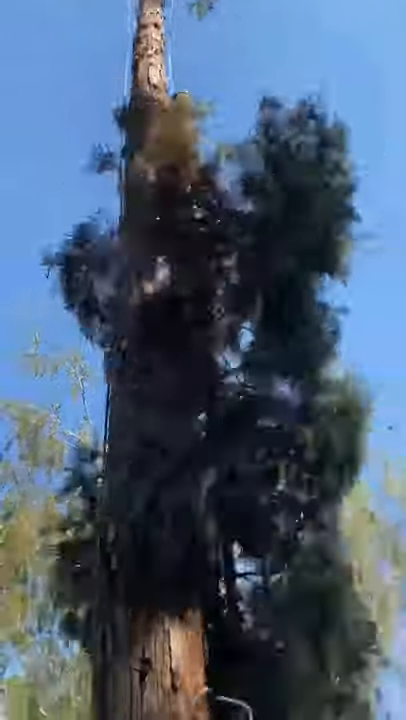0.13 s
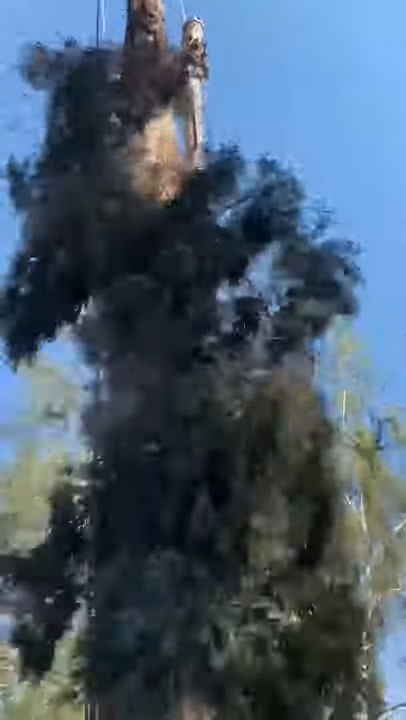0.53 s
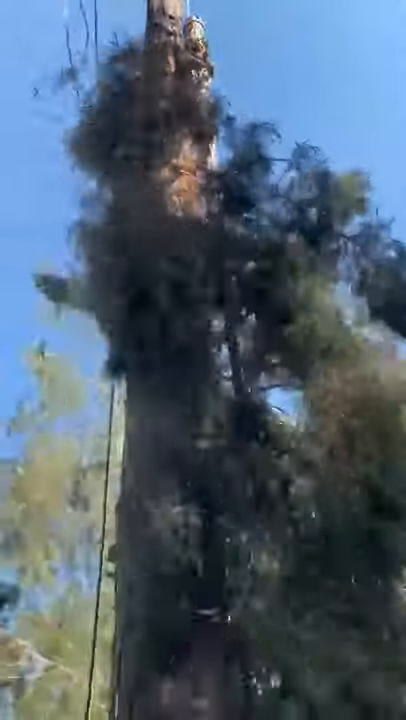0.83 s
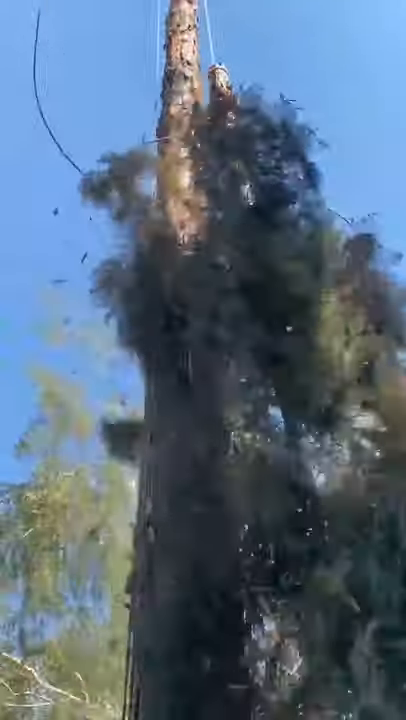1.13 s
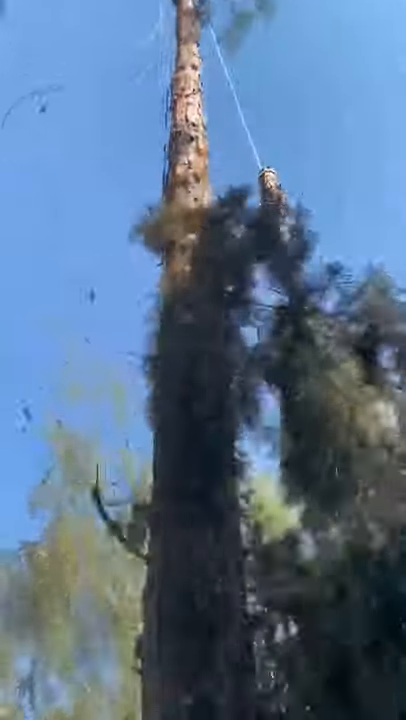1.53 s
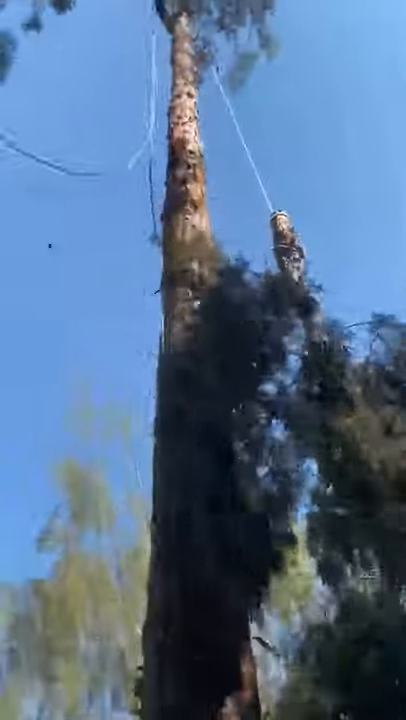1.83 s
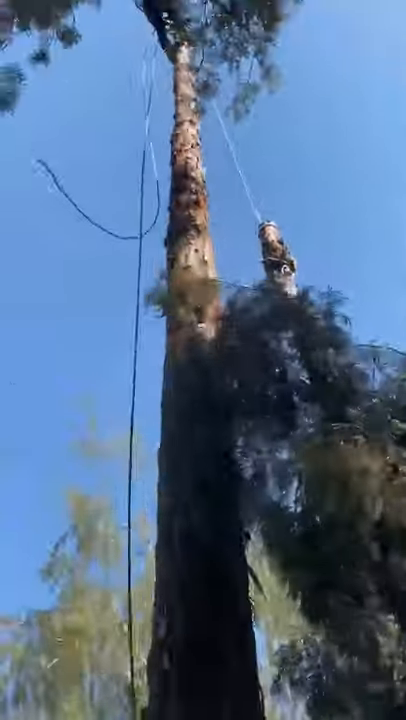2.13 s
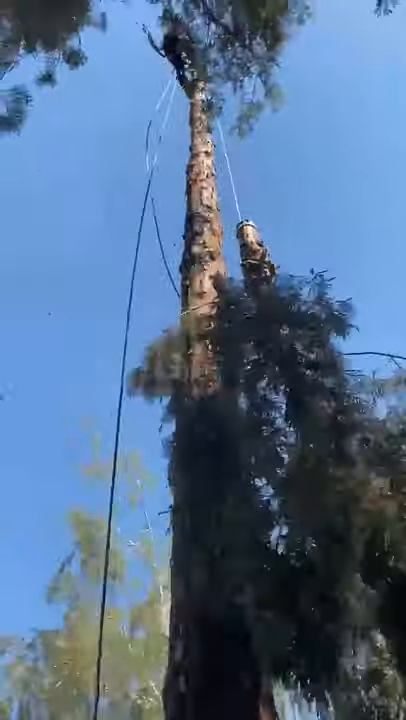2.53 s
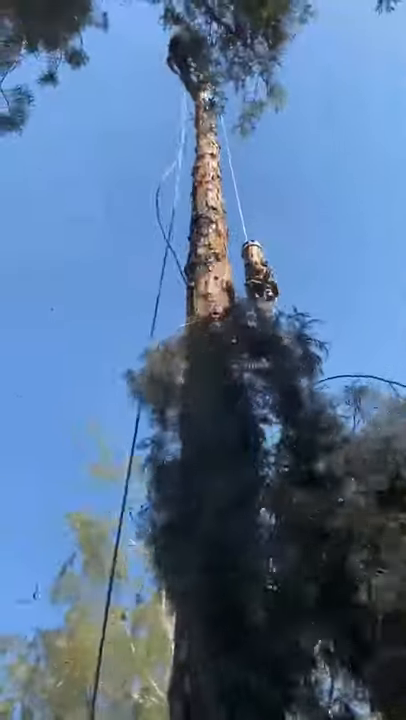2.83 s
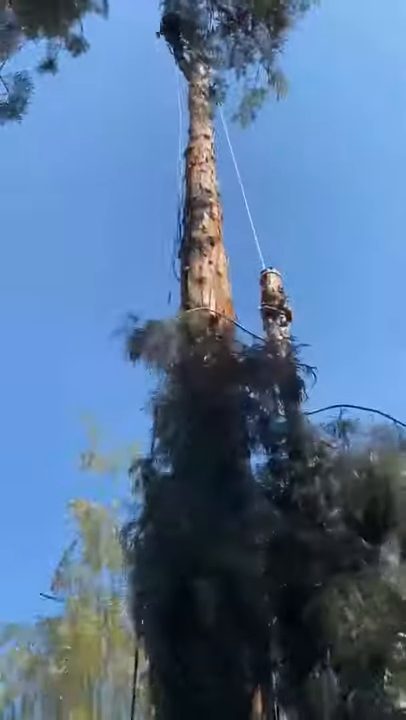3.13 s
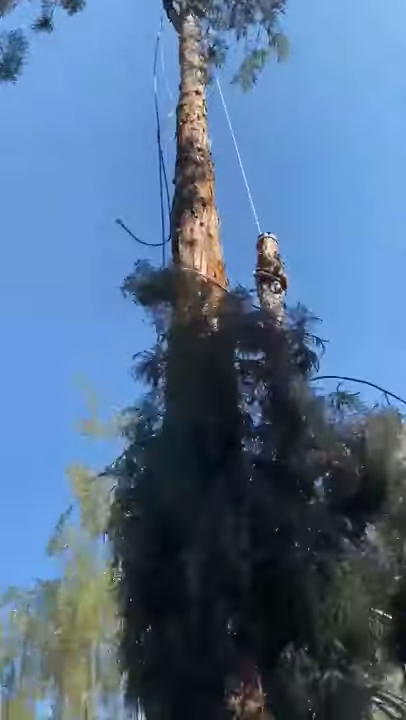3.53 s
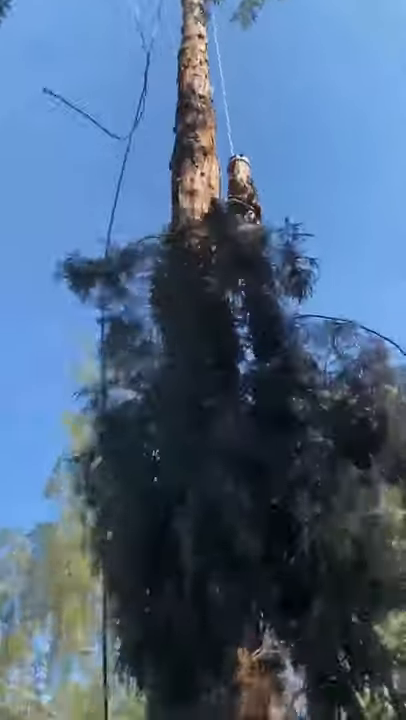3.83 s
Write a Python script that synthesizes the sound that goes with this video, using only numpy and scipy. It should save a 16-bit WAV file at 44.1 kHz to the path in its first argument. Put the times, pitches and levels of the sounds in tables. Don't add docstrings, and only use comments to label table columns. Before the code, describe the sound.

Branches crash against a trunk at the very start with dense bright cracking and a short thud; foliage then drags and swishes more quietly, with twigs ticking and limbs bumping, in open forest, phone stereo microphone.

```python
import sys
import numpy as np
from scipy import signal
from scipy.fft import rfft, irfft, next_fast_len
from scipy.io import wavfile
from scipy.ndimage import uniform_filter1d, map_coordinates

SR = 44100
rng = np.random.default_rng(int(sys.argv[2]) if len(sys.argv) > 2 else 0)


def file_out(sig):
    cols = np.atleast_2d(sig).T
    lim = np.clip(cols, -1, 1)
    pcm = np.round(lim * 32767).astype(np.int16)
    wavfile.write(sys.argv[1], SR, pcm)


def volts(x):
    e = np.asarray(x, float) / 20
    return 10 ** e


N = 176400


def unit(x):
    return x / np.sqrt(np.mean(x ** 2) + 1e-20)


def along(points, hz):
    f, v = np.transpose(points)
    return np.interp(np.log(hz + 1), np.log(f + 1), v)


def wobble(rate):
    return map_coordinates(rng.standard_normal(N // 100), [np.arange(N) * rate / SR])


def filtered(x, response):
    n = x.shape[-1]
    m = next_fast_len(n + 8192)
    return irfft(rfft(x, m) * response(np.fft.rfftfreq(m, 1 / SR)), m)[..., :n]


def peak(hz, q):
    return lambda f: 1j * f * hz / q / (hz * hz - f * f + 1j * f * hz / q)


def rush(spectrum, patchy_db):
    z = signal.stft(rng.standard_normal((2, N)), nperseg=512)[2]
    patches = rng.standard_normal(z.shape[1:])
    patches = uniform_filter1d(patches, size=8, axis=0)
    patches = unit(uniform_filter1d(patches, size=10, axis=1))
    pair = signal.istft(z * volts(patchy_db * patches), nperseg=512)[1][:, :N]
    return unit(filtered(pair, lambda hz: volts(along(spectrum, hz))))


def crackle():
    per_second, middle_hz, spread_db, ring_cycles = 900, 4840, 9.5, 2.25
    u = rng.random((int(per_second * N / SR), 4))
    k = np.arange(128)
    hz = np.clip(middle_hz * np.exp(2.4 * (u[:, 1:2] - .5)), 300, 15000)
    cycles = hz * k / SR
    loudness = volts(-spread_db * np.log(u[:, 2:3] + .06)) * (hz / middle_hz) ** 0.39
    grain = loudness * np.sin(2 * np.pi * cycles) * np.exp(-cycles / ring_cycles)
    at = ((u[:, :1] * N).astype(int) + k).ravel()

    def lay(grains):
        return np.bincount(at, grains.ravel(), N + len(k))[:N]

    sideways = np.sqrt(12) * (u[:, 3:] - .5)
    return unit(np.array([lay(grain), lay(grain * sideways)]))


def foliage():
    # (time [s], strength [dB], body over hiss [dB])
    swish = [(0, -27.5, -5), (.05, -31, -1.5), (.11, -28.5, 1), (.2, -30.5, 2), (.3, -39, 4),
             (.7, -39.5, -0.5), (1.09, -42, 3), (1.14, -45, 1.5), (1.2, -42.5, 1), (1.5, -40.5, 0.6),
             (2.3, -45, -3), (2.55, -49, 0.5), (2.68, -54.5, 1.5), (2.92, -48, 3.5), (2.96, -46, 6),
             (3.14, -45.5, 3.5), (3.33, -47.5, 0.5), (4, -47, -2)]
    # (frequency [Hz], level [dB])
    hiss_colour = [(800, -15), (2000, -2), (3500, -4), (5500, 1.5), (9000, -1.5), (16000, -3)]
    # (frequency [Hz], level [dB])
    body_colour = [(80, -61), (250, -1), (800, 1), (1600, -1.5), (2700, 2.5), (3500, -6), (6000, -10.5)]
    s, strength_db, body_db = np.transpose(swish)
    t = np.arange(N) / SR
    shared_db = np.interp(t, s, strength_db) + .8 * wobble(8) + .7 * wobble(30)
    hiss = volts(1.5 + 0.11 * wobble(21)) * rush(hiss_colour, patchy_db=1.5)
    body_level = volts(-2.5 + np.interp(t, s, body_db) + 0.25 * wobble(13.0))
    body = body_level * rush(body_colour, patchy_db=1.86)
    clicks = volts(-7.5 + 1.6 * wobble(8.3)) * crackle()
    return volts(shared_db) * (hiss + body + clicks)


def engine():
    # (frequency [Hz], level [dB])
    rumble = [(25, -43), (45, -5), (70, 0.5), (120, -1), (250, -10.5), (600, -15.5), (2000, -24)]
    extra_db, settle_s = 7, 1
    settling_db = extra_db * np.exp(-np.arange(N) / SR / settle_s)
    return volts(-51.5 + settling_db + 1.2 * wobble(2.54)) * rush(rumble, patchy_db=1.8)


def bursts(rows, q, wide, rise_s, noise, gain_db, order):
    out, t = np.zeros(N + SR), np.arange(SR // 8) / SR
    for s, db, hz, t60 in rows:
        t60 = max(t60, .001)
        shape = (1 - np.exp(-t / rise_s)) * volts(-60 * t / t60)
        push = volts(-60 * 1.5 * t / t60) * np.sin(2 * np.pi * hz * t)
        puff = shape * (noise * rng.standard_normal(len(t)) + (1 - noise) * push)
        hit = filtered(puff, lambda f: peak(hz, q)(f) ** order)
        if hz < 400:
            hit = hit + 0.64 * filtered(shape * rng.standard_normal(len(t)), peak(2.3 * hz, q))
        hit = hit + wide * filtered(puff, peak(5200, 0.31))
        out[round(s * SR):][:len(t)] += volts(db + gain_db) * hit / np.abs(hit).max()
    return out[:N]


def breaking_branches():
    # (time [s], peak [dB], centre [Hz], fall by 60 dB [s])
    crash = [(0.101, -10, 2550, 0.0036), (0.111, -16, 6400, 0.013), (0.1152, -13, 6400, 0.004),
             (0.129, -20, 12500, .01), (0.1322, -2.5, 5800, 0.0093), (0.136, -10, 1750, 0.0064),
             (0.1445, -11, 7050, 0.0052), (0.1515, -7.5, 3760, 0.0092), (0.156, -6, 3080, 0.016),
             (0.158, -10, 4440, 0.0057), (0.172, -7.5, 4570, 0.017), (0.1778, -2, 6600, 0.0046)]
    # (time [s], peak [dB], centre [Hz], fall by 60 dB [s])
    twigs = [(0.3162, -19.5, 5850, 0.0093), (0.34, -19.5, 2060, 0.011), (0.3981, -16.5, 5300, 0.0034),
             (0.419, -19.5, 1720, 0.0068), (0.447, -20, 5200, 0.0071), (0.5535, -25, 1900, 0.0087),
             (0.612, -19, 2440, 0.0064), (0.645, -16.5, 4140, 0.0068), (0.6592, -19.5, 2410, 0.0079),
             (0.867, -22.5, 5530, 0.005), (0.938, -24, 2400, 0.0062), (0.9561, -31, 7780, 0.005),
             (0.9643, -29, 6200, 0.005), (0.9721, -18, 5900, 0.014), (0.9737, -16, 5580, 0.01),
             (0.9774, -13.5, 6570, 0.0084), (0.9857, -30, 2540, 0.016), (1.056, -27, 5580, 0.018),
             (1.067, -26, 2800, 0.0056), (1.1607, -23.5, 5800, 0.0036), (1.445, -24, 5400, 0.016),
             (2.2953, -30, 5950, 0.0081), (2.691, -40, 1570, 0.0044), (2.941, -26, 8600, 0.013),
             (3.4898, -28, 4850, 0.013),
             (1.097, -27, 5500, 0.0066), (1.101, -27, 3320, 0.0059), (2.638, -30, 6900, .012),
             (2.695, -31, 7200, 0.018), (2.7784, -35, 6000, .005), (2.5553, -32.5, 5480, 0.0054),
             (2.952, -33, 2000, .008), (2.966, -28.5, 1800, .012), (2.987, -35, 8000, .005),
             (3.012, -35, 2500, .005), (3.094, -35, 1510, 0.011), (3.105, -32, 1500, .008),
             (3.131, -30, 2500, .012), (3.163, -30, 2500, .008), (3.195, -31, 2180, 0.0093),
             (3.258, -31.5, 6200, .006), (3.455, -29, 5800, 0.011), (3.509, -31, 6360, 0.007),
             (3.636, -31.5, 1900, .008), (3.643, -37, 5300, .004), (1.69, -26, 3030, 0.0069),
             (2.358, -25.5, 6000, 0.0033), (3.2995, -31, 4150, .01), (.978, -22, 2500, .015)]
    return bursts(crash + twigs, q=1.0, wide=0.43, rise_s=.0015, noise=0.46, gain_db=1, order=1)


def dry_snaps():
    # (time [s], peak [dB], centre [Hz], fall by 60 dB [s])
    brittle = [
        (0.1295, -21, 14000, .02),
        (0.9735, -28, 13500, .02),
        (1.5418, -28, 13500, .008),
        (2.128, -31, 13500, .008),
        (2.7165, -33, 13500, .015),
        (3.0378, -30, 12000, .004),
        (3.2985, -28, 13500, .012),
    ]
    # (time [s], peak [dB], centre [Hz], fall by 60 dB [s])
    sharp = [(0.6012, -18, 2560, 0.0047), (0.6012, -26, 5600, .006), (1.0872, -17, 2620, .004),
             (1.5416, -16, 6560, .008), (2.1277, -21, 6600, 0.0056), (2.716, -27.5, 9000, 0.0098),
             (3.0378, -21.5, 8750, 0.0082), (3.2985, -23.5, 2600, 0.013), (0.147, -19, 13500, .03),
             (0.158, -24, 13500, .03), (0.171, -26, 13500, .025), (0.178, -35, 13500, .015)]
    top = bursts(brittle, q=1.0, wide=.05, rise_s=.0002, noise=.9, gain_db=1, order=2)
    return top + bursts(sharp, q=1.0, wide=0.6, rise_s=.0002, noise=.8, gain_db=1, order=1)


def limb_knocks():
    # (time [s], peak [dB], pitch [Hz], fall by 60 dB [s])
    knocks = [(0.131, -20, 610, 0.058), (0.144, -26, 387, 0.054), (0.184, -23.5, 410, 0.019),
              (0.198, -26, 348, 0.026), (0.396, -22.5, 560, 0.041), (0.671, -29.5, 763, 0.035),
              (0.799, -23.5, 228, 0.048), (0.812, -28, 332, 0.04), (1.009, -34, 860, 0.041),
              (1.083, -24.5, 222, 0.082), (1.287, -31, 193, 0.068), (1.279, -34.5, 412, 0.037),
              (1.281, -30.5, 960, 0.051), (1.593, -33, 312, 0.04), (1.595, -34, 960, 0.022),
              (0.8, -41, 800, 0.033), (1.602, -33.5, 160, 0.02), (2.179, -45.5, 260, 0.091),
              (2.629, -41, 151, 0.073), (3.096, -38, 196, 0.046), (3.319, -38, 1020, 0.019),
              (0.139, -22.5, 221, 0.14),
        (0.167, -33, 143, 0.24),
        (0.328, -32.5, 193, 0.067),
        (0.468, -38, 205, 0.042),
        (0.818, -30.5, 127, 0.086),
        (1.106, -36, 303, 0.14),
        (1.152, -33, 105, 0.09),
        (2.178, -39, 925, 0.01),
        (3.1, -46, 780, 0.032),
    ]
    return bursts(knocks, q=1.4, wide=0.066, rise_s=.003, noise=.55, gain_db=-0.5, order=2)


def hard_blows():
    # (time [s], peak [dB], pitch [Hz], fall by 60 dB [s])
    blows = [
        (0.1713, -2, 1120, 0.0047),
        (0.174, -17.5, 647, 0.079),
        (0.145, -17, 400, 0.012),
        (0.134, -15.5, 1800, 0.035),
        (0.37, -32, 430, .03),
        (0.164, -14, 960, 0.012),
    ]
    return bursts(blows, q=1.0, wide=0.12, rise_s=.0005, noise=.25, gain_db=-0.5, order=1)


def forest(x):
    # (frequency [Hz], fall by 60 dB [s])
    fading = [(150, 0.3), (1500, 0.088), (10000, 0.055)]
    hz, t, z = signal.stft(rng.standard_normal((2, SR // 2)), SR, nperseg=256)
    tail = signal.istft(z * volts(-60 * t / along(fading, hz)[:, None]), SR, nperseg=256)[1]
    tail = tail / np.linalg.norm(tail[0])
    delayed = np.pad(x, (200, 0))[None]
    return signal.fftconvolve(delayed, tail, axes=1)[:, :N]


def turned(pair, lead):
    halves = np.array([[1], [-1]])
    return filtered(pair, lambda hz: np.exp(.5j * np.interp(hz, *np.transpose(lead)) * halves))


def scene():
    # (frequency [Hz], side share [dB])
    width = [(60, -63), (300, -17), (1000, 1), (1700, -9.5), (4000, -7), (10500, -4), (11800, -11.5),
             (13000, -25)]
    # (frequency [Hz], extra left lead [rad])
    aside = [(0, 0), (345, -.5), (750, -1.7), (1030, -1.3), (1380, 0), (2400, .5), (3500, 0)]
    steady = foliage() + engine()
    hits = breaking_branches() + dry_snaps() + limb_knocks() + hard_blows()
    direct = hits * np.array([[1], [-.05]])
    mid, side = direct + volts(-13.5) * forest(hits) + steady
    side = filtered(side, lambda hz: volts(along(width, hz)))
    side = side + filtered(hits, lambda hz: 1j * volts(-8.5) * (hz > 11700))
    pair = np.array([mid + side, mid - side])
    past = np.interp(np.arange(N) / SR, (.19, .3), (0, 1))
    return (1 - past) * pair + past * turned(pair, aside)


def roll_off(x):
    return signal.sosfilt(signal.butter(12, 16020, fs=SR, output="sos"), x)


def record(dry):
    # (frequency [Hz], left leads right [rad])
    port_lead = [(0, 0), (345, -.2), (1300, -.3), (2070, .5), (2800, 1.6), (3150, 1.7), (3800, .9),
                 (4150, 1.1), (4550, 2.3), (4790, 3.14), (5150, 5.9), (6630, 7.2), (8960, 8.2),
                 (10300, 8.5), (11500, 9.42), (16000, 9.42)]
    # (frequency [Hz], left over right [dB])
    tilt = [(400, 0), (800, -1), (1200, 0), (1800, -0.8), (2700, -1), (4400, -1.5), (5300, 0), (7000, 0)]
    # (frequency [Hz], level [dB])
    mic = [(9500, 0.5), (11000, -1.5), (12500, -11.5), (14500, -14), (15750, -5), (15950, -50)]
    halves = np.array([[.5], [-.5]])
    ports = filtered(turned(dry, port_lead), lambda hz: volts(along(mic, hz) + along(tilt, hz) * halves))
    ceiling = .97
    mix = ports / (1 + np.abs(ports / ceiling) ** 6) ** (1 / 6)
    return roll_off(mix)


dry = scene()
out = record(dry)
file_out(out)
```